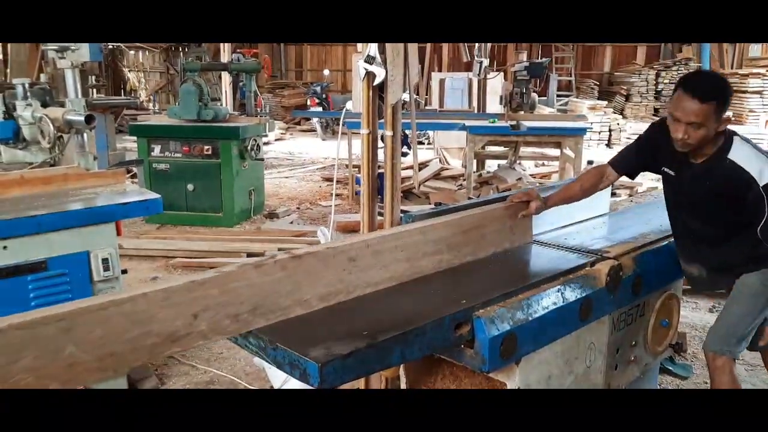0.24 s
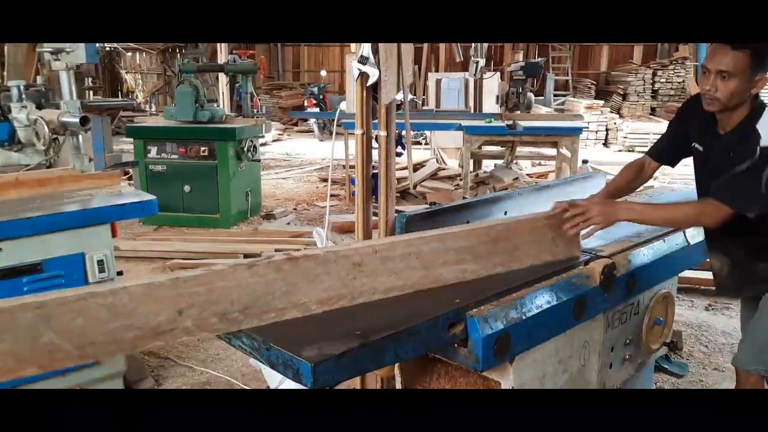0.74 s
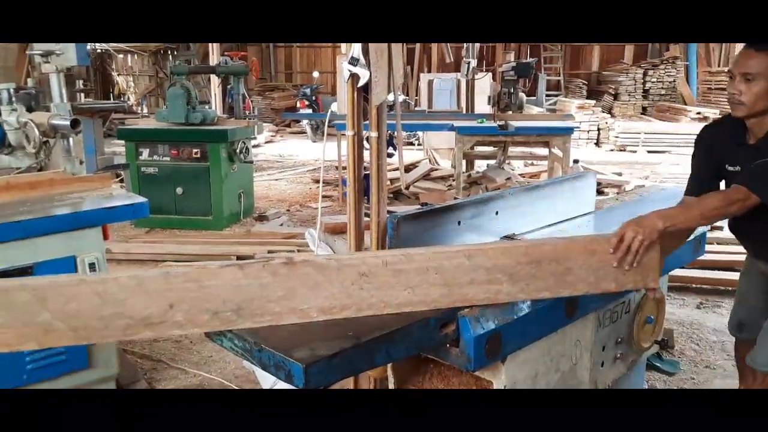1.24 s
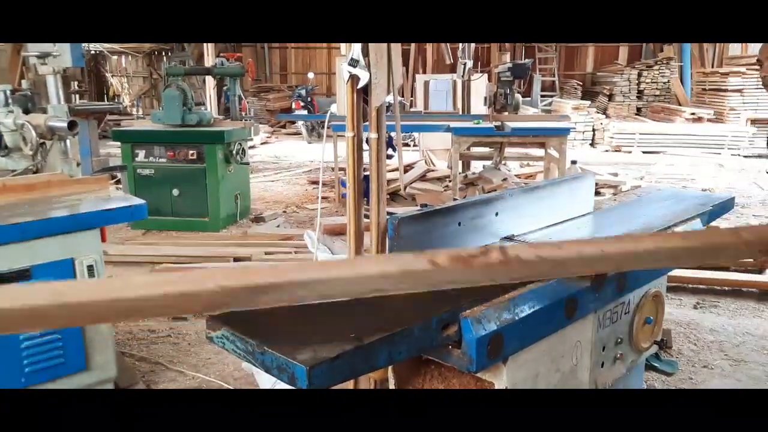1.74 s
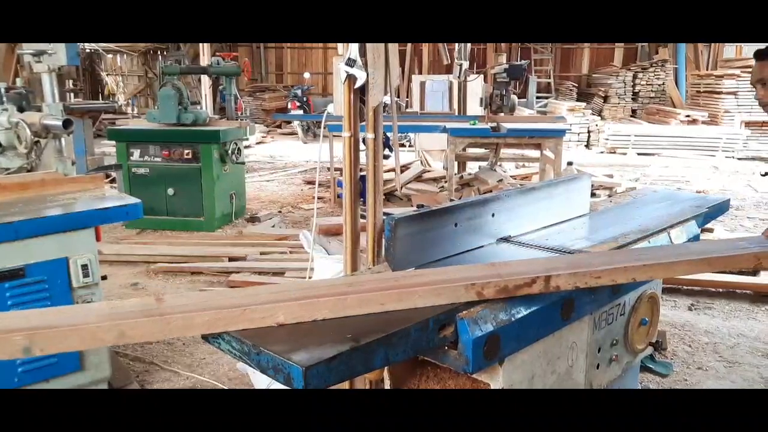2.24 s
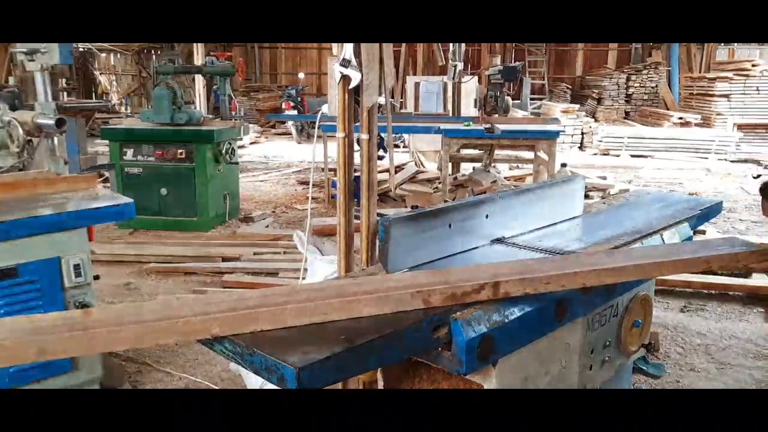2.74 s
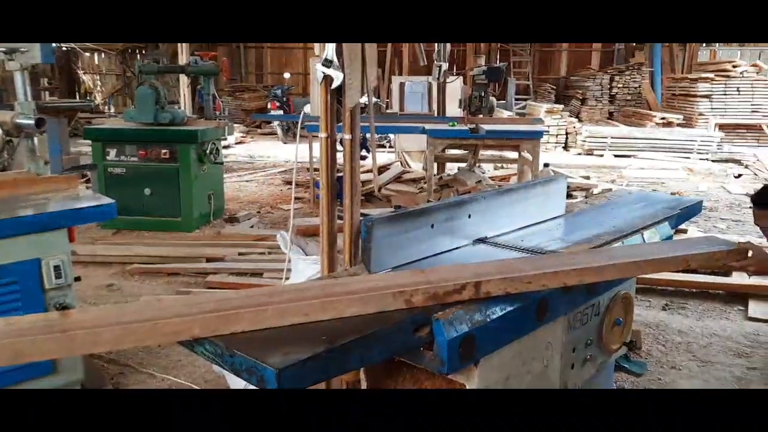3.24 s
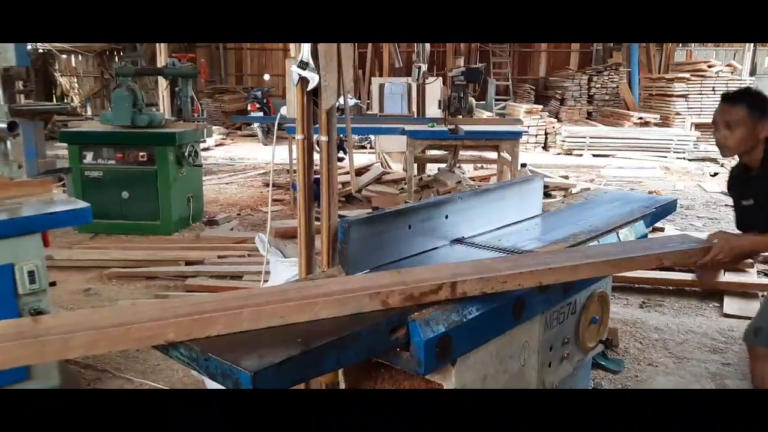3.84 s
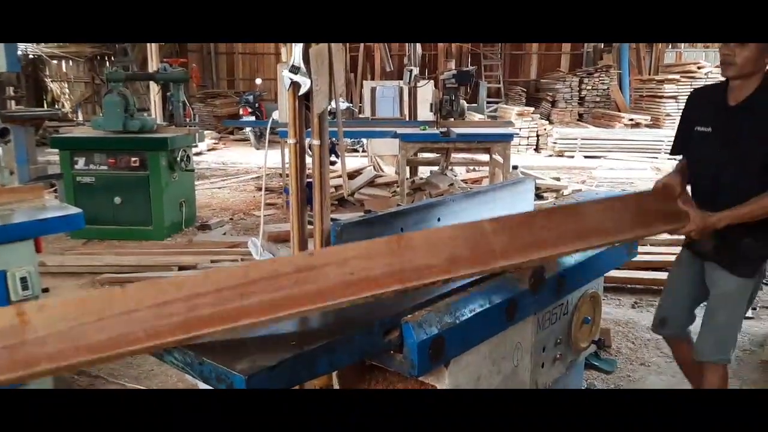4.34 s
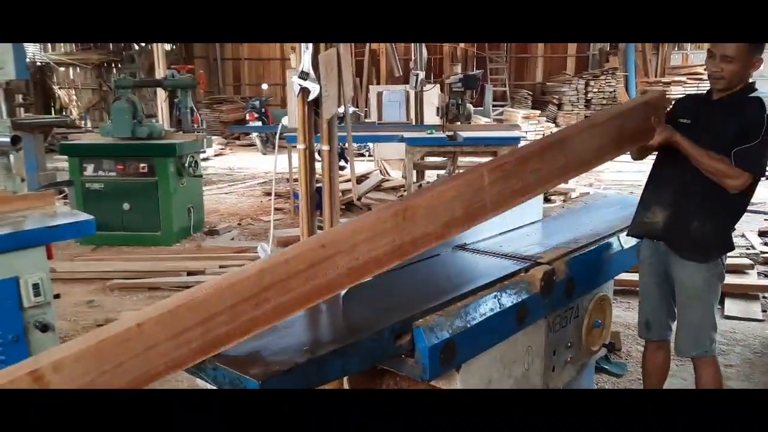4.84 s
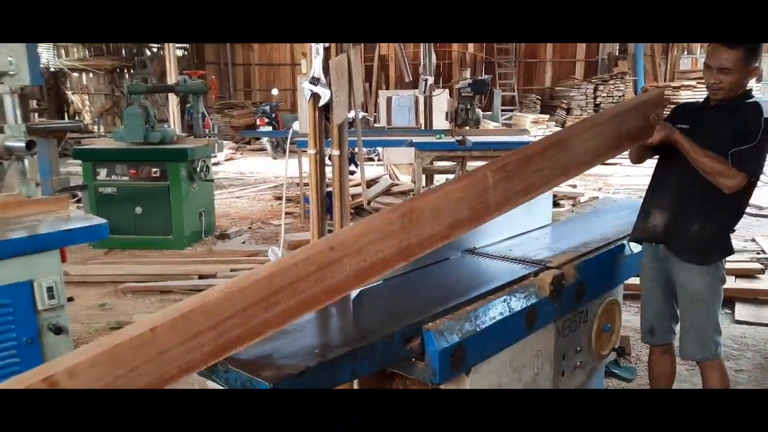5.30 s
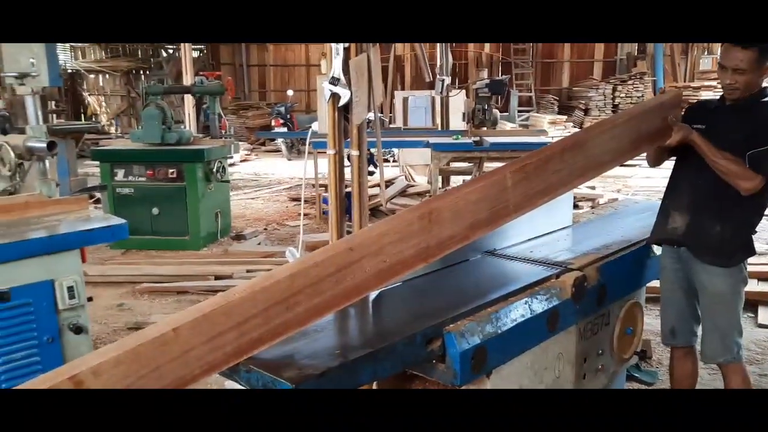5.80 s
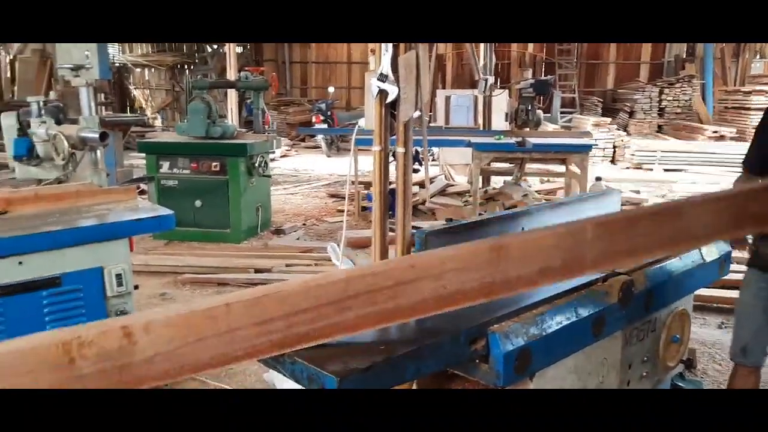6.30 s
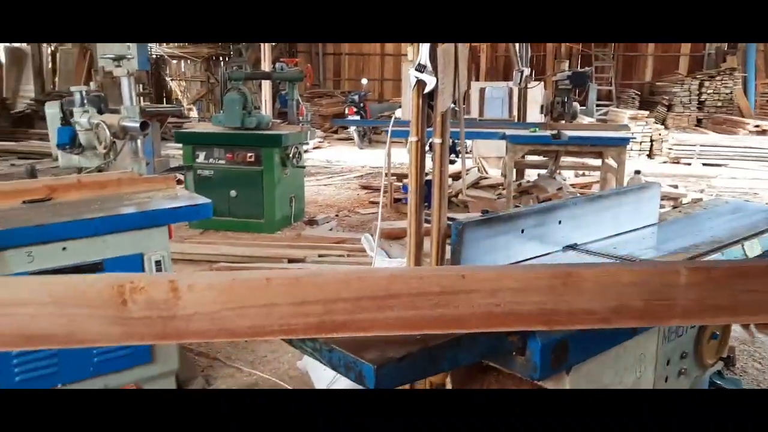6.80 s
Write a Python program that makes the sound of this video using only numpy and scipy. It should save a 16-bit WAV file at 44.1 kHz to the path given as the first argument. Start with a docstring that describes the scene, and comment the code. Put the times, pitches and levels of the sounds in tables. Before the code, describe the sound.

In an open timber workshop, a jointer drones on one steady low pitch with buzzing panels and a rattling belt drive. The sound opens on the tail of a harsh, hissing cut with splinter snaps, which dies quickly. The hum swells as the board is drawn clear. The board knocks onto the metal bed near two seconds, then an air nailer fires six times, each shot followed by a puff. Stereo microphones, fairly close.

```python
"""A belt-driven jointer in a timber workshop: its four knives chop the air into a hum, over a rattling drive.
Knife blows ring board and bed; splinters snap during the cut, which then dies away.
The hum grows as the board is drawn clear; the board lands on the bed in a short run of knocks, made of
decaying modes and dull noise.
An air nailer fires six times: noise bursts for shot and struck timber, then a puff of exhaust."""
import sys
import numpy as np
from scipy import signal
from scipy.fft import rfft, irfft, next_fast_len
from scipy.io import wavfile
from scipy.ndimage import map_coordinates

SR = 44100
rng = np.random.default_rng(int(sys.argv[2]) if len(sys.argv) > 2 else 0)


def wrap_up_sound(samples):
    """Save the sound to the file named by the first command line argument, as 16-bit audio."""
    columns = np.atleast_2d(samples).T
    # keep every value between -1 and 1, then stretch to whole-number steps
    tamed = np.clip(columns, -1, 1)
    steps = np.round(tamed * 32767).astype(np.int16)
    wavfile.write(sys.argv[1], SR, steps)


N = 311346
TIME_S = np.arange(N) / SR

# Cutterhead hum. Each row: multiple of the shaft speed, relative level in dB.
HUM_LINES = [(3.5, -19), (4, -0.5), (12, -37), (16, -39.5), (21, -40.5), (37, -53), (39, -46)]
# Buzzing parts of stand and panels. Each row: pitch in Hz, pitch waver in Hz, relative level in dB.
STAND_PARTS = [(71.3, 5.56, -39.5), (106.4, 13, -46), (138.5, 5, -36), (171.2, 9, -46.5), (204.1, 6, -38),
               (257.2, 2.5, -39), (296.5, 3.5, -43), (330, 5.8, -39), (351.1, 4.5, -35.5),
               (385.4, 6.63, -33), (413, 8.9, -43), (513.3, 11, -41), (582.6, 3.1, -45),
               (662.6, 4.014, -38.5), (697.3, 13, -38.5), (787, 5.94, -46.5), (1170, 3, -57),
               (1257, 6.6, -56)]
# Loose random clatter. Each row: frequency in Hz, relative spectrum level in dB.
CLATTER_SPECTRUM = [(20, -15.5), (45, 1.5), (65, -3), (130, -10.5), (200, -0.5), (275, 8.5), (380, 2.5),
                    (500, -5.5), (720, -6), (900, -21.5), (1400, -24), (3000, -64)]
# Air rushing round the knives. Each row: frequency in Hz, relative spectrum level in dB.
RUSH_SPECTRUM = [(400, -25), (900, -0.5), (1400, 0), (1700, -5.5), (2500, -5), (3200, -10.5), (5000, -15),
                 (6100, -12), (7300, -18), (8500, -16), (9700, -24), (12500, -18.5), (15000, -24),
                 (16000, -32)]
# Rattle that comes round with belt and pulley. Each row: frequency in Hz, relative spectrum level in dB.
RATTLE_SPECTRUM = [(300, -31.5), (400, -24), (445, 3.5), (500, 9), (570, -6), (630, 5), (690, -1.5),
                   (740, 2), (810, 0), (865, -8), (920, -9.5), (990, -16.5), (1400, -12), (3000, -34.5)]
# How hard the machine shakes. Each row: time in seconds, relative level in dB.
SHAKE_CURVE = [(1.0, -34), (2.25, -32.5), (4.04, -31), (4.27, -32.5), (6.32, -33), (6.55, -35),
               (7.06, -34.5)]
# Chips being cut. Each row: frequency in Hz, relative spectrum level in dB.
CHIP_SPECTRUM = [(600, -25), (1100, -4.5), (1480, -2), (1800, -5.5), (2500, 0), (3000, -8), (4300, -4),
                 (6000, -13.5), (8500, -13), (10000, -16.5), (15500, -18.5)]
# Splinters snapping during the cut. Each row: start in seconds, relative level in dB.
SPLINTER_SNAPS = [(.002, -15.5), (0.011, -18), (0.041, -24), (0.07, -17.5), (0.076, -23), (0.092, -24.5),
                  (0.1168, -24)]
# Colour of a snap. Each row: frequency in Hz, relative spectrum level in dB.
SNAP_SPECTRUM = [(1000, -33), (2500, -10), (5000, -8.5), (9000, -9.5), (14000, -4), (16000, -7)]
# Board landing on the bed. Each row: start in seconds, relative level in dB.
BOARD_KNOCKS = [(1.9588, -11), (1.975, -27.5), (1.989, -29), (2.008, -19), (2.052, -28.5)]
# Modes of the board. Each row: frequency in Hz, relative level in dB, t60 in seconds.
BOARD_MODES = [(482.5, -13.5, 0.52), (622, -3, 0.039), (701, 1.5, 0.051), (790, -4, 0.025),
               (1173, -4.5, 0.03), (1310, 0, 0.017), (1376, -11, 0.018), (1470, -20.5, 0.16),
               (1850, -14, 0.012), (2330, -17, 0.017)]
# Dull noise of a knock. Each row: frequency in Hz, relative spectrum level in dB.
THUD_SPECTRUM = [(350, -20), (550, 3), (720, 0.5), (950, -6), (1350, -4), (1700, -10), (2500, -18),
                 (4000, -39.5), (8000, -68)]
# Nailer. Each row: shot start in seconds, shot level in relative dB, wait until the exhaust in seconds,
# exhaust level in relative dB.
NAILER_SHOTS = [(2.912, -33.5, 0.1, -31.5), (3.491, -29.5, 0.1, -32), (4.276, -32, 0.097, -31.5),
                (5.082, -33, 0.092, -31.5), (6.267, -33, 0.082, -33), (6.843, -30.5, .074, -33.5)]
# Nailer's shot. Each row: frequency in Hz, relative spectrum level in dB.
SHOT_SPECTRUM = [(1000, -22.5), (2000, 0), (3500, -6), (5000, -6), (8000, -4.5), (10000, -10), (15500, -8)]
# Timber struck by the nail. Each row: frequency in Hz, relative spectrum level in dB.
TIMBER_SPECTRUM = [(800, -9.5), (1400, -1.5), (2000, 1), (2500, -1.5), (3200, -8), (4500, -9), (7000, -23)]
# Nailer's exhaust. Each row: frequency in Hz, relative spectrum level in dB.
EXHAUST_SPECTRUM = [(800, -19.5), (2000, 0.5), (4000, -3.5), (6500, -1.5), (9500, -4.5), (13000, 2),
                    (16500, -6.5)]
# Likeness of the two microphones. Each row: frequency in Hz, correlation (clipped to -1..1).
MIC_LIKENESS = [(60, 0.5), (385, 2), (480, -1), (700, 0.66), (1200, 0.23), (2400, 0.08), (5000, -0.16),
                (9000, 0), (15000, 0)]
# Balance of the two microphones. Each row: frequency in Hz, left over right in dB.
MIC_LEAN = [(60, 2), (150, 3), (280, 3), (700, 3.5), (1300, 4.5), (2400, 1), (4500, -1), (8500, -1),
            (14000, 2.5)]
# Decay of the workshop. Each row: frequency in Hz, t60 in seconds.
SHOP_DECAY = [(200, 1), (1500, 0.35), (6000, 0.36), (15000, 0.11)]

TOP_HZ = 15900
# knife passes a second; quick flutter and slow drift from the belt, as shares of the speed
KNIFE_HZ, FLUTTER_SHARE, DRIFT_SHARE = 275.16, 0.0032, 0.0011
HUM_DB = -17.0
# octave of the hum at average shaking, and its fade per dB of shaking
OCTAVE_DB, OCTAVE_FADE_DB_PER_DB = -43.5, 3.9
# the board starts to clear the head, and how long that takes
CLEAR_S, CLEARING_S = 0.71, 0.27
# what the covering board takes from hum, rush, buzz and shaking
MUFFLE_HUM_DB, MUFFLE_RUSH_DB, MUFFLE_BUZZ_DB, DAMP_DB = 4, 2, 1, 1.5
# buzz of the stand at average shaking, and its growth per dB of shaking
BUZZ_DB, BUZZ_GROWTH_DB_PER_DB = 1.5, 0.14
# a loose panel: its steady hum, and what dragging the board adds (relative to the buzz)
PANEL_DB, DRAG_DB = -40.5, -42
DRAG_S, DRAG_RISE_S, DRAG_HOLD_S, DRAG_T60_S = 0.58, 0.1, 0.76, 1.2
# the bite eases until the board leaves the knives, then dies away
BITE_DB, BITE_EASE_DB_PER_S, CUT_END_S, CUT_T60_S = -29, 5, 0.21, 0.28
CHIP_RING_T60_S = 0.014
VENT_HOLD_S = 0.031


def amp(db):
    """Decibels to gain."""
    return 10 ** (np.asarray(db) / 20)


def unit(x):
    """Scale to rms 1."""
    return x / np.sqrt(np.mean(x ** 2) + 1e-20)


def along(points, hz):
    """Read (Hz, value) points on a log frequency axis."""
    f, v = np.transpose(points)
    return np.interp(np.log(hz + 1), np.log(f + 1), v)


def wobble(rate_hz):
    """Smooth random curve, rate_hz knots a second."""
    knots = rng.standard_normal(int(N * rate_hz / SR) + 4)
    return map_coordinates(knots, [TIME_S * rate_hz])


def filtered(x, response):
    """Multiply the spectrum of x by a response of frequency."""
    size = next_fast_len(N + SR // 2)
    hz = np.fft.rfftfreq(size, 1 / SR)
    return irfft(rfft(x, size) * response(hz), size)[..., :N]


def coloured(x, spectrum):
    """Give x a spectrum, at rms 1."""
    return unit(filtered(x, lambda hz: amp(along(spectrum, hz))))


def spread(pair):
    """Mix two unrelated signals so that the microphones correlate as in MIC_LIKENESS."""
    def share(hz):
        alike = np.clip(along(MIC_LIKENESS, hz), -1, 1)
        return np.sqrt([1 + alike, 1 - alike])
    mid, side = filtered(pair, share)
    return unit(np.array([mid + side, mid - side]))


def noise(gate=1):
    """Gated white noise at both microphones."""
    return spread(gate * rng.standard_normal((2, N)))


def burst(start_s, rise_s, hold_s, t60_s):
    """Envelope that opens, holds and dies away; the hold counts from the start."""
    t = np.maximum(TIME_S - start_s, 0)
    return (1 - np.exp(-t / rise_s)) * amp(-60 * np.maximum(t - hold_s, 0) / t60_s)


def strokes(turns, life, scatter_db):
    """One decaying stroke of random size per turn; life is a share of the turn."""
    elapsed = turns - turns.min()
    whole = np.floor(elapsed).astype(int)
    sizes = amp(scatter_db * rng.standard_normal(whole.max() + 1))
    return sizes[whole] * np.exp(-(elapsed % 1) / life)


def repeating(turns, size=1024):
    """Two random patterns that repeat at every turn."""
    cycles = irfft(np.exp(2j * np.pi * rng.random((2, size // 2 + 1))))
    phase = np.arange(size) / size
    return np.array([np.interp(turns, phase, cycle, period=1) for cycle in cycles])


def shop(x, wet_db):
    """Add the answer of roof and timber stacks: decaying noise, different at each microphone."""
    hz, t, z = signal.stft(rng.standard_normal((2, SR // 2)), SR, nperseg=256)
    decay = amp(-60 * t / along(SHOP_DECAY, hz)[:, None])
    tail = signal.istft(z * decay, SR, nperseg=256)[1]
    tail = np.pad(tail / np.linalg.norm(tail[0]), ((0, 0), (SR // 200, 0)))  # 5 ms late
    return x + amp(wet_db) * signal.fftconvolve(np.atleast_2d(x), tail, axes=1)[:, :N]


def covered():
    """1 while the board covers the cutterhead, 0 once it is drawn clear."""
    return np.clip(1 - (TIME_S - CLEAR_S) / CLEARING_S, 0, 1)


def shaking():
    """Shaking in dB about its average, damped by the board pressed over the head."""
    level_db = np.interp(TIME_S, *np.transpose(SHAKE_CURVE))
    return level_db - level_db.mean() - DAMP_DB * covered()


def cutterhead(turns):
    """Knives chop the air at the table lips like a siren, muffled while the board covers them."""
    def line(multiple):
        return np.sqrt(2) * np.sin(2 * np.pi * (multiple * turns + rng.random()))
    hum = amp(HUM_DB) * sum(amp(db) * line(multiple) for multiple, db in HUM_LINES)
    # once the head is clear, the octave fades as the shaking grows
    octave_db = OCTAVE_DB - OCTAVE_FADE_DB_PER_DB * shaking() * (1 - covered())
    return amp(-MUFFLE_HUM_DB * covered()) * (hum + amp(octave_db) * line(8))


def stand(drift_db=0.45, panel_hz=484, panel_waver_hz=6):
    """Parts buzz as sines of drifting level and wavering pitch; one panel swells as the board is dragged."""
    shake_db = shaking()

    def buzz(hz, waver_hz):
        turns = np.cumsum(hz + waver_hz * wobble(28)) / SR
        return np.sqrt(2) * np.sin(2 * np.pi * (turns + rng.random()))

    parts = np.zeros(N)
    for hz, waver_hz, db in STAND_PARTS:
        # higher parts swell with the shaking
        swell_db = np.interp(hz, [400, 650], [0, 1.1]) * shake_db
        parts += amp(db + swell_db + drift_db * wobble(2.6)) * buzz(hz, waver_hz)
    drag = burst(DRAG_S, DRAG_RISE_S, DRAG_HOLD_S, DRAG_T60_S)
    panel = amp(PANEL_DB) + amp(DRAG_DB) * drag
    return parts + panel * buzz(panel_hz, panel_waver_hz)


def drive(belt_hz=19.35, pulley_hz=35.77, belt=1.4, pulley=0.9, rattle_db=-32.0,
          clatter_db=-34.5, rush_db=-40.5, rush_throb=0.12, rush_repeat=0.51):
    """Belt and pulley beat on the stand, which rattles and buzzes; the air rush throbs with them."""
    shake_db = shaking()
    belt_turns = np.cumsum(belt_hz * (1 + 0.006 * wobble(14))) / SR
    pulley_turns = np.cumsum(pulley_hz * (1 + 0.02 * wobble(12))) / SR
    belt_beat = belt * strokes(belt_turns, life=0.089, scatter_db=0.5)
    pulley_beat = pulley * strokes(pulley_turns, life=0.5, scatter_db=1)
    beat = unit(0.5 + belt_beat + pulley_beat)

    pattern = repeating(belt_turns) + repeating(pulley_turns, size=512)
    rattle = amp(shake_db + rattle_db) * coloured(spread(beat * pattern), RATTLE_SPECTRUM)

    buzz_db = BUZZ_DB + BUZZ_GROWTH_DB_PER_DB * shake_db - MUFFLE_BUZZ_DB * covered()
    clatter = amp(clatter_db) * coloured(noise(beat), CLATTER_SPECTRUM)
    body = amp(buzz_db) * (stand() + clatter)

    # the part repeating with each belt lap gives a fine whirring grain
    air = noise(1 + rush_throb * beat) + rush_repeat * spread(repeating(belt_turns))
    air_db = rush_db - MUFFLE_RUSH_DB * covered() + 0.69 * wobble(11)
    return rattle + body + amp(air_db) * coloured(air, RUSH_SPECTRUM)


def cut(turns, proud=2.3, tear=0.7):
    """Each knife takes a chip; one stands proud and adds a bite once a turn."""
    dying_db = 60 * np.maximum(TIME_S - CUT_END_S, 0) / CUT_T60_S
    bite_db = BITE_DB - BITE_EASE_DB_PER_S * TIME_S - dying_db
    # fibres give way a little early or late, which roughens the pitch
    knife_turns = 4 * turns + 0.035 * wobble(140)
    blows = strokes(knife_turns, life=0.51, scatter_db=4)
    blows = blows + proud * strokes(turns, life=0.14, scatter_db=1.0)
    impacts = np.maximum(np.diff(blows, prepend=blows[0]), 0)
    # every blow rings the same dense, equally strong modes of board and bed, so the cut has a pitch
    t = np.arange(SR // 20) / SR
    modes = rfft(rng.standard_normal((2, len(t))) * amp(-60 * t / CHIP_RING_T60_S))
    ring = irfft(modes / np.abs(modes))[:, :len(t) // 2]
    ringing = unit(signal.fftconvolve(impacts[None], ring, axes=1)[:, :N])
    chips = shop(ringing + tear * noise(blows), wet_db=-0.5)
    return amp(bite_db) * coloured(chips, CHIP_SPECTRUM)


def splinters(snap_db=-1):
    """Fibres snap as short noise bursts."""
    snaps = sum(amp(db + snap_db) * burst(start_s, rise_s=0.00014, hold_s=0.002, t60_s=0.011)
                for start_s, db in SPLINTER_SNAPS)
    return shop(snaps * coloured(noise(), SNAP_SPECTRUM), wet_db=-1)


def board(thud_db=-11):
    """The board drops on the bed and chatters: each knock rings its modes and adds a dull thud."""
    t = np.arange(SR // 2) / SR
    contact = 1 - np.exp(-t / 0.001)
    rings, thuds = np.zeros(N), np.zeros(N)
    for start_s, db in BOARD_KNOCKS:
        # mode levels scatter from knock to knock
        ring = sum(amp(level_db + rng.normal(0, 1) - 60 * t / t60_s) * np.sin(2 * np.pi * hz * t)
                   for hz, level_db, t60_s in BOARD_MODES)
        rings[round(start_s * SR):][:len(t)] += amp(db) * ring * contact
        thuds += amp(db + thud_db) * burst(start_s, rise_s=0.00078, hold_s=0.0022, t60_s=0.069)
    return shop(rings + thuds * coloured(noise(), THUD_SPECTRUM), wet_db=-6)


def nailer(sputter_db=2, shot_db=-3, timber_db=-1.0):
    """Air drives the nail into timber with a chuff, then vents as the trigger is let go."""
    shots, blows, vents = np.zeros((3, N))
    for start_s, db, wait_s, vent_db in NAILER_SHOTS:
        shots += amp(db + shot_db) * burst(start_s, rise_s=0.0015, hold_s=0.008, t60_s=0.28)
        blows += amp(db + timber_db) * burst(start_s, rise_s=0.002, hold_s=0.017, t60_s=0.25)
        vents += amp(vent_db) * burst(start_s + wait_s, rise_s=0.001, hold_s=VENT_HOLD_S, t60_s=0.23)
    sound = shots * coloured(noise(), SHOT_SPECTRUM)
    sound += blows * coloured(noise(), TIMBER_SPECTRUM)
    sound += vents * coloured(noise(), EXHAUST_SPECTRUM)
    # turbulent jets sputter
    return shop(amp(sputter_db * wobble(350)) * sound, wet_db=-3.5)


def scene():
    """Machine, board and nailer at two microphones."""
    speed = 1 + FLUTTER_SHARE * wobble(30) + DRIFT_SHARE * wobble(3)
    turns = np.cumsum(KNIFE_HZ / 4 * speed) / SR  # four knives a turn
    mix = cutterhead(turns) + drive() + cut(turns) + splinters() + board() + nailer()
    half = np.array([[0.5], [-0.5]])

    def microphones(hz):
        # left is 90 microseconds later up to 900 Hz; above that the phase gap stays constant
        lag = np.exp(-2j * np.pi * half * np.minimum(hz, 900) * 9e-5)
        return amp(half * along(MIC_LEAN, hz)) * lag
    return filtered(mix, microphones)


def record(dry):
    """Keep nothing at or above the band limit."""
    return filtered(dry, lambda hz: hz < TOP_HZ)


dry = scene()
out = record(dry)
wrap_up_sound(out)
```